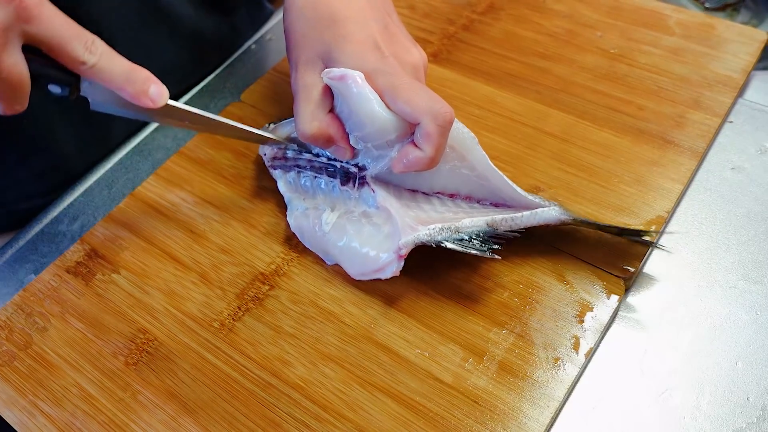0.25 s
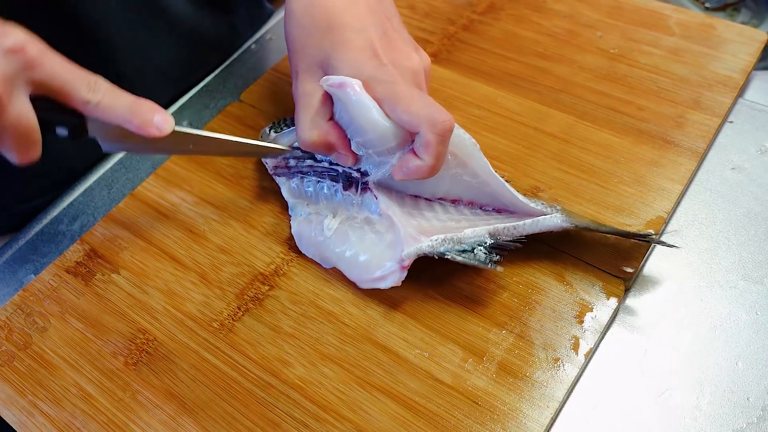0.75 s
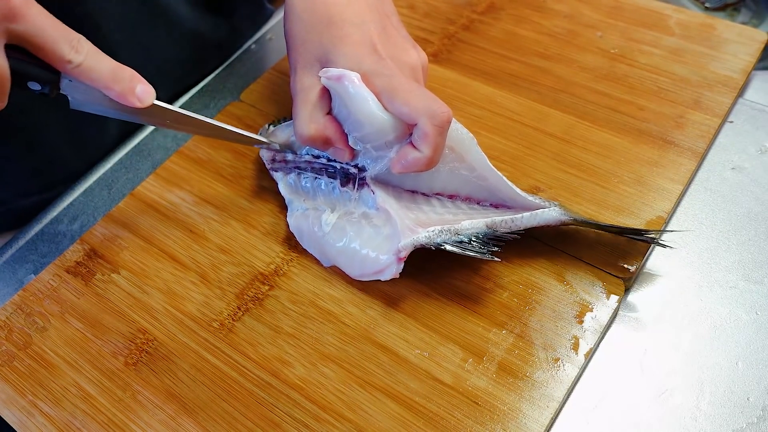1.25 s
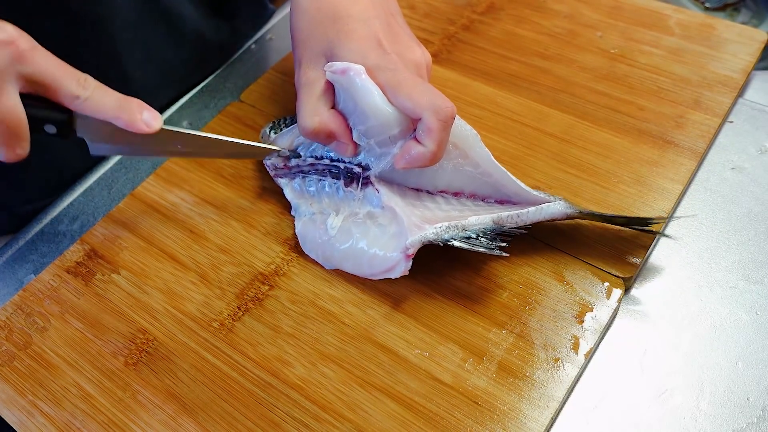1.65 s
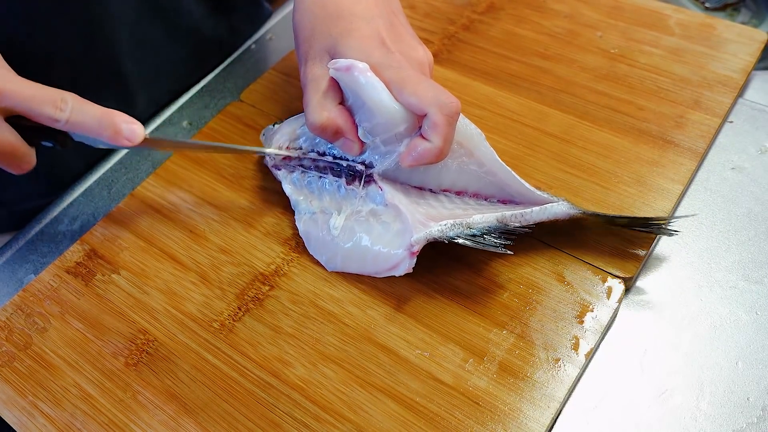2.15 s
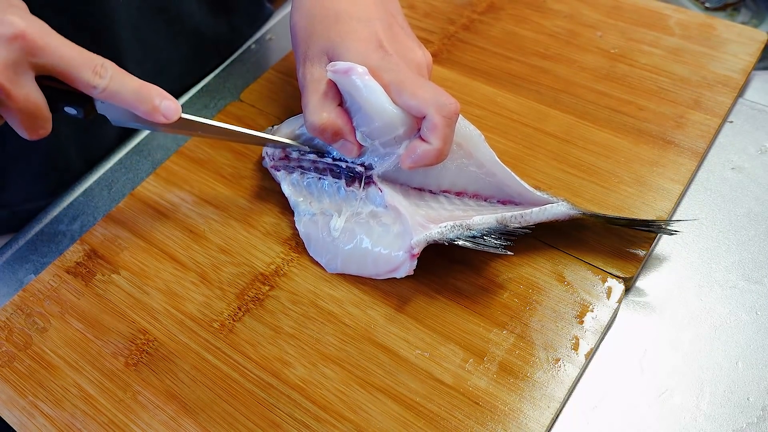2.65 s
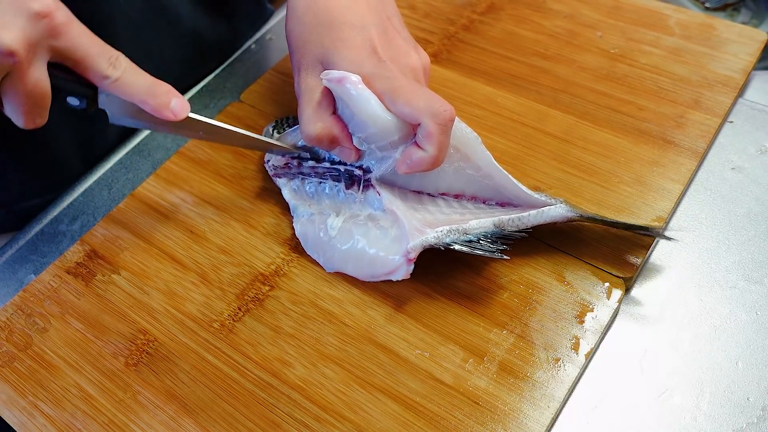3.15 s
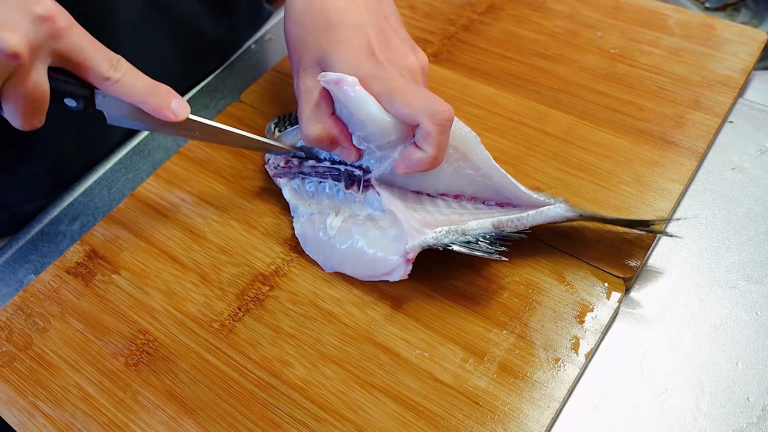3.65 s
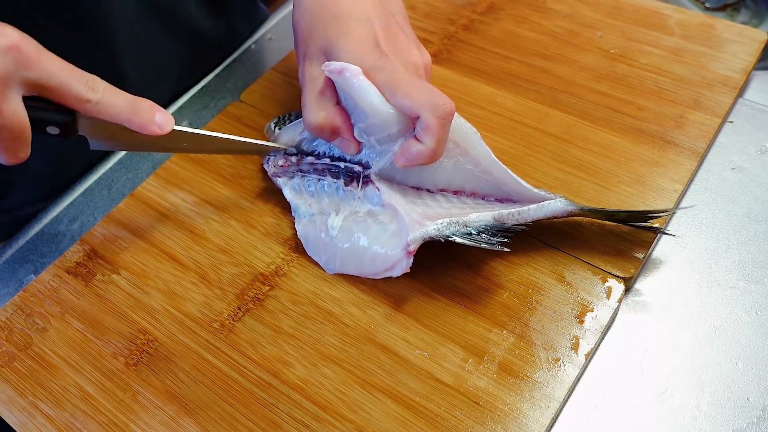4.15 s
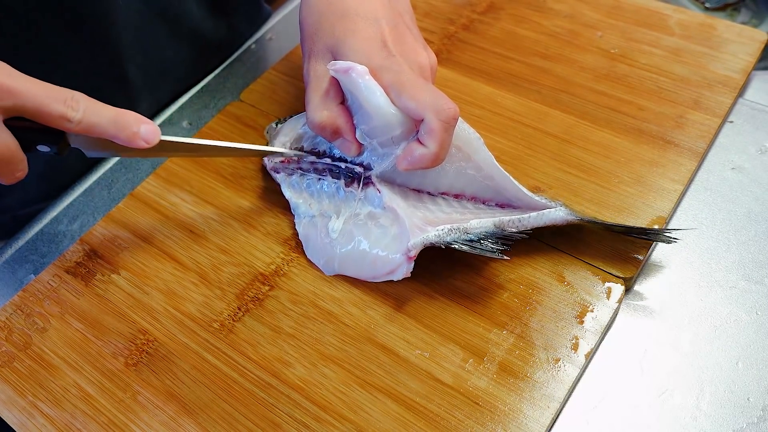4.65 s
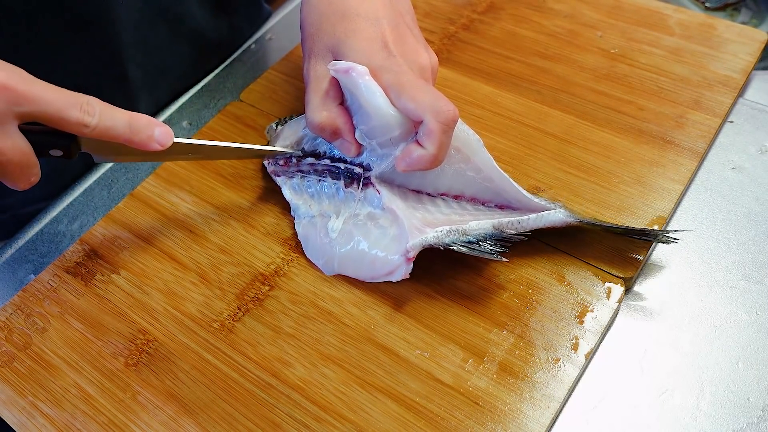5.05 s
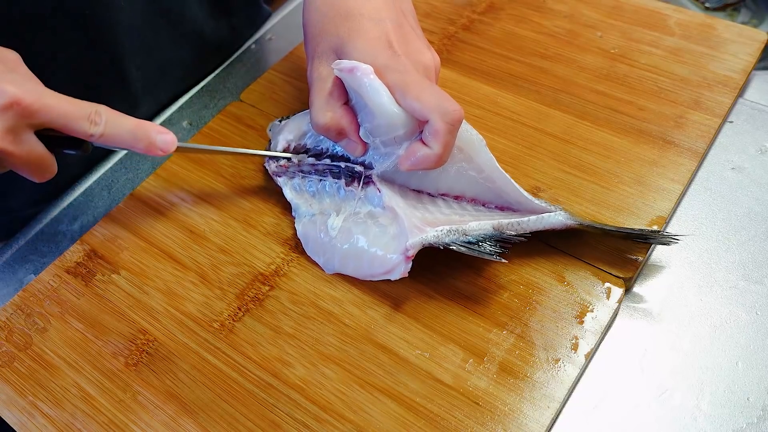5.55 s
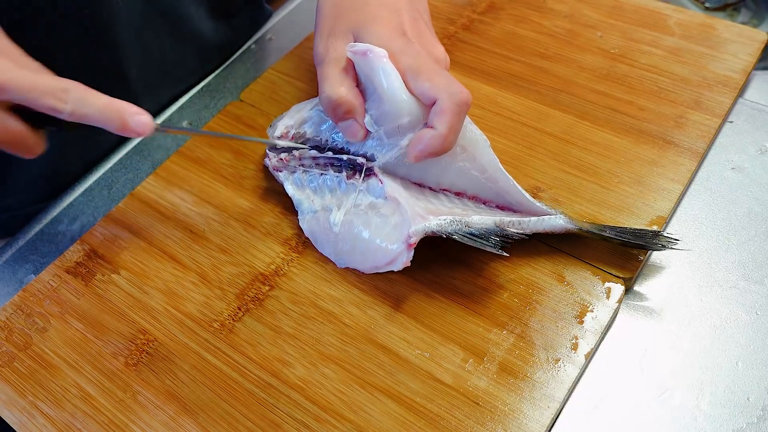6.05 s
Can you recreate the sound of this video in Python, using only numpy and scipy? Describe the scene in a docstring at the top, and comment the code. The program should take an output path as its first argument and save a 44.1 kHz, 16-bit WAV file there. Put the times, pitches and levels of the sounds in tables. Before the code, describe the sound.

Close to the microphone, a knife cuts fish bones on a wooden board. Small ticks and wet crackling lead to a hard cluster of snaps and thumps early on, then a quieter stretch with wet pops. A denser run of bright cracks follows, ending in a strong snap; after a lull come a few more clicks. Steady ventilation rushes throughout a small, hard-walled kitchen.

```python
"""First comes a tiny rasp of steel on bone, over the steady rush of ventilation in a small hard kitchen.
A knife works along the backbone of a fish on a wooden board, close to the microphone. Ribs snap (bursts of
tiny breaks), thump the board and ring the blade (dying sines); in between, the edge rasps (filtered slips),
wet flesh crackles (random clicks) and pops (short rising tones). Noise echoes make the room."""
import sys
import numpy as np
from scipy import signal
from scipy.fft import rfft, irfft
from scipy.io import wavfile
from scipy.ndimage import uniform_filter1d

SR = 44100
rng = np.random.default_rng(int(sys.argv[2]) if len(sys.argv) > 2 else 0)


def pcm_store(signal):
    """Save signal as 16-bit PCM."""
    levels = np.round(np.clip(np.atleast_2d(signal), -1, 1) * 32767)
    wavfile.write(sys.argv[1], SR, levels.astype(np.int16).T)


N = 277830  # length in samples: 6.3 s

# All levels in the tables are starting levels, trimmed again in the mix.
# how fast the room's echo dies: pitch_hz, time_to_fall_60_db_s
ROOM_DECAY = [(200, 0.52), (600, 0.65), (1500, 0.33), (4000, 0.25), (9000, 0.25), (15000, 0.18)]
# tone of the room's echo: pitch_hz, level_db
ROOM_COLOUR = [(150, -1), (400, 2), (1500, 2), (4000, -3.5), (8000, -2), (15000, -3.5)]
# echoes from near surfaces: delay_ms (varied a little at random), share (of the direct sound)
NEAR_ECHOES = [(.85, 0.41), (2.55, 0.023), (3.1, 0.21)]
# tone of the ventilation: pitch_hz, relative_level_db (per Hz)
VENT_COLOUR = [(25, -18), (90, -16), (125, -13.5), (160, -15), (200, -5), (330, 2), (480, 2), (800, 0),
               (1050, -3), (1500, -2), (2500, -10.5), (5000, -16), (7000, -17.5), (15800, -23.5)]
# how alike the ventilation is at left and right: pitch_hz, likeness (0 to 1)
VENT_LIKENESS = [(100, 0.65), (600, 0.59), (3000, 0.5), (7000, 0.46), (15000, 0.84)]
# faint fan tones: pitch_hz (average), level_db
VENT_TONES = [(430, -67.5), (1443, -72.5), (1836, -70)]
# the fish shoved over the board: start_s, length_s, level_db
SHOVES = [(.015, 0.027, -38.5), (.06, 0.043, -49), (0.257, .09, -42.5), (1.339, 0.044, -35),
          (1.389, 0.044, -41), (1.598, 0.058, -44.5), (5.321, .06, -58), (5.418, 0.033, -58),
          (6.282, .03, -43.5)]
# the knife breaks through and drives the fish into the board: start_s, level_db
THUDS = [(.024, -42), (.1338, -34.5), (0.3883, -29), (0.7471, -41), (0.9923, -44), (1.3473, -27),
         (1.3665, -22), (1.3927, -25), (1.4154, -29.5), (1.7502, -29.5), (3.093, -29), (3.4653, -37),
         (3.6161, -27.5), (3.8973, -35.5), (4.0475, -34), (5.4207, -34), (5.6296, -37.5)]
# what the board rings with: pitch_hz, level_db, time_to_fall_60_db_s
BOARD = [(127, -4, 0.13), (275.5, -6, 0.11), (346, 0.5, 0.031), (450, -2.5, 0.012), (570, -15, 0.021)]
# what the steel blade rings with: pitch_hz, level_db, time_to_fall_60_db_s
BLADE = [(1550, 11, 0.076), (2200, 10, 0.099), (3650, 4, 0.12), (3830, 10.5, 0.099), (4300, -14, 0.11),
         (5080, 6, 0.16), (7700, 1, 0.18), (7500, -33, 0.15), (7600, -48, 0.14), (8170, -14, 0.23),
         (10000, -6, .2), (12000, -2, .2), (12900, -16, .2), (13482, -18, .2)]
# wet pops as the blade peels off the flesh: start_s, pitch_hz, level_db, decay_ms (sets the time scale)
POPS = [(0.2206, 5850, -35, 0.3), (1.901, 5030, -40, 0.48), (2.0175, 5030, -42.5, .7),
        (2.0625, 4530, -25, 0.35), (2.1831, 4740, -35, .22), (2.1872, 5160, -32.5, 0.87),
        (2.9355, 3860, -41.5, .8), (3.2042, 5700, -29.5, 0.21), (3.4956, 4200, -36, 0.084),
        (3.557, 4520, -39, 0.21), (3.7217, 3240, -38.5, 0.27), (3.7691, 4550, -33.5, 0.32),
        (3.795, 4700, -41, 0.2), (4.8547, 5170, -44, 1.7), (5.155, 4530, -49, 0.38),
        (5.249, 4940, -45.5, 0.44)]
# strokes of the knife through wet flesh: start_s, length_s, effort_db (at the start of the stroke)
STROKES = [(0.0, 0.56, -48), (0.61, 0.93, -49.5), (1.304, 0.62, -46), (1.963, 0.44, -51.5),
           (2.64, 0.46, -54), (3.095, 0.41, -47.5), (3.42, 0.6, -46.5), (4.105, 0.37, -47),
           (5.329, 0.24, -43), (5.567, 0.43, -51.5)]
# the edge dragged over bone: start_s, length_s, level_db, pitch_hz, fizz_db (relative to the rasp)
RASPS = [(0.0, 0.0067, -31, 6000, 10), (0.022, 0.1, -48.5, 6440, 3), (1.398, 0.026, -43, 3320, 17),
         (1.407, 0.043, -36, 7600, -3), (1.735, 0.019, -37, 4620, 5), (2.129, 0.055, -34, 4340, -1),
         (3.097, 0.013, -47, 4420, 3), (3.405, 0.039, -54, 5600, -7), (3.664, .044, -49, 7300, 11),
         (5.328, 0.023, -47, 7250, 11), (5.335, 0.071, -55.5, 1550, -13), (5.408, 0.033, -35.5, 7100, -10),
         (5.625, .014, -41, 5650, -7)]
# bones snapping under the edge:
# start_s, crumble_ms (sets the time scale), strength_db, brightness_db, knock_db (through the flesh)
CRACKS = [(.0224, 1.5, -45, -9, -38), (.0733, 1, -40.5, -1, -43), (.1322, 0.54, -27, -1, -32.5),
          (.3868, 0.45, -33, 4.5, -31.5), (.5388, 0.39, -45, 3.5, -51), (.6916, .5, -36, 4, -46),
          (.7432, 1.8, -38, 0, -52), (.7638, 1.4, -39.5, 4, -57), (.7782, 0.93, -36, 4.5, -61),
          (.7916, .3, -42, 4, -64), (.9898, 1.1, -39, 1.5, -30.5), (1.3151, 1.1, -49, -8.5, -45),
          (1.341, 1, -34, 2.5, -45), (1.3459, 2.3, -40.5, -7, -32), (1.3645, 0.48, -19.5, 0, -23.5),
          (1.39, 0.37, -23, 2, -29.5), (1.4128, .9, -23.5, 0.5, -47), (1.577, 0.84, -41.5, -1, -44.5),
          (1.7472, 0.27, -25, 4, -33), (1.8138, 0.73, -42, 4, -51), (1.926, 0.17, -28.5, 1.5, -53),
          (2.5729, 0.97, -39, -4, -61), (2.812, 1.2, -37, 3.5, -66), (2.9137, .2, -49.5, 8, -51),
          (3.0328, 1.2, -42, 0, -59), (3.0513, 0.44, -29.5, -5.5, -34), (3.0808, 1.2, -21, 2, -28),
          (3.0914, 2.1, -18, 0.5, -54), (3.0989, 0.39, -42, 5, -33), (3.1068, 2, -33, 6, -45),
          (3.2155, 0.17, -37, 13.5, -45), (3.2814, 0.39, -44.5, 7.5, -48), (3.3703, 0.6, -43.5, 5, -58),
          (3.4138, .9, -45, -6, -50), (3.4351, 2.6, -51, -9, -48), (3.4639, 2.4, -29, 2.5, -36),
          (3.5937, .3, -42, 3, -46), (3.6139, 1, -37, -3, -36.5), (3.765, 0.82, -40, 3, -46),
          (3.8102, 1.7, -37.5, -0.5, -44), (3.876, .8, -28, -1.5, -32.5), (3.8955, 1, -22.5, 0.5, -35),
          (3.9396, 0.48, -32, 1.5, -43), (4.0339, 1.5, -46, 0, -34.5), (4.0462, 0.73, -14.5, 1, -25),
          (4.351, 3.4, -44, -4, -47.5), (4.8548, 1.5, -51, -2, -63), (5.3555, 2.2, -37, -2, -42),
          (5.408, 0.53, -27.5, 4, -36), (5.4199, 0.22, -22, 3, -29.5), (5.5017, 1.8, -41, 3, -59),
          (5.602, 3.9, -41, 5, -62), (5.6278, 10, -32, -1, -39), (5.924, 1.3, -40.5, 5, -66),
          (5.938, 1.2, -34, 9, -65)]
# the middle colour of breaking bone: pitch_hz (for a bone that snaps at SNAP_HZ), level_db
SNAP = [(1400, -24.5), (2300, -2.5), (3300, -1), (4000, 0), (4500, 1.5), (5100, -5.5), (5800, -1),
        (6800, -13.5), (9000, -42)]
# the crisp colour of breaking bone: pitch_hz, level_db
CRISP = [(4500, -38), (6000, -5.5), (6700, -8), (7300, 0.5), (8300, 0.5), (9000, 0.5), (10500, 2),
         (12500, -22)]
# the highest, fizzing colour of breaking bone: pitch_hz, level_db
FIZZ = [(8500, -36.5), (11000, -2.5), (13000, 0.5), (14500, 1), (15700, -7), (16800, -19)]
# the dull knock of a blow through the flesh: pitch_hz, level_db
KNOCK = [(150, -33), (450, -16.5), (850, -9), (1100, -13.5), (1420, -5), (1650, 6.5), (1850, -5),
         (2080, -9.5), (2400, -15.5), (3400, -15), (6000, -55)]
# the short woody ring of that knock: pitch_hz, level_db, time_to_fall_60_db_s
KNOCK_RING = [(1420, 0, .014), (1580, -1, .014)]
# soft rustle of fish on wood: pitch_hz, level_db
RUSTLE = [(150, -16.0), (330, -4.5), (600, -7.0), (1000, -19.5), (1550, -13.5), (2300, -18.5), (5000, -36)]
# fizz of steel on bone: pitch_hz, level_db
RASP_FIZZ = [(1500, -1), (6500, 10.5), (13000, 9), (16000, 3.5)]

CLUTTER_S = .007  # fading time of the scatter from board, fish and hands
VENT_DB = -47.5  # level of the rushing air
EDGE_HZ = 16300  # upper band limit of the microphone
SNAP_HZ = 4500  # the middle of the SNAP colour
# a bone of middling strength (BONE_DB) snaps at BONE_HZ; stronger ones are thicker and snap lower
BONE_HZ, BONE_DB, BONE_HZ_PER_DB = 5020, -20, -42
BONE_RING_S = 0.0053  # a broken bone's ring falls 60 dB in this time
# each stroke bites quickly, eases as the flesh parts and lets go; a resting knife barely crackles
BITE_S, EASE_DB_PER_S, LET_GO_S, REST_DB = 0.013, -13, 0.041, -59
CLUMP_DB = 2.5  # fibres part in clumps: how much the crackle wavers
# how strongly a snap and a sliding edge ring the steel
SNAP_BLADE_DB, SLIDE_BLADE_DB = -14, -22


def amp(db):
    """Turns decibels into a gain."""
    return 10 ** (np.asarray(db) / 20)


def evened(x):
    """Scales to an average strength (rms) of one."""
    return x / np.sqrt(np.mean(x ** 2) + 1e-20)


def unit(x):
    """Scales to an energy of one."""
    return x / np.sqrt(np.sum(x ** 2) + 1e-20)


def blow(sound, db):
    """Gives a short sound the energy of 5 ms at this level."""
    return amp(db) * np.sqrt(.005 * SR) * unit(sound)


def read(points, hz):
    """Reads a table between its points, with pitch on a logarithmic scale."""
    point_hz, value = np.transpose(points)
    return np.interp(np.log(hz + 1), np.log(point_hz + 1), value)


def add(mix, s, sound):
    """Mixes a sound in, starting at s seconds."""
    part = mix[round(s * SR):][:len(sound)]
    part += sound[:len(part)]


def colour(points, size=2048):
    """Makes the most compact pulse (minimum phase) with a given spectrum that does not start early."""
    log_gain = np.log(amp(read(points, abs(np.fft.fftfreq(size, 1 / SR)))))
    spectrum = np.exp(np.conj(signal.hilbert(log_gain)))
    return unit(np.fft.ifft(spectrum).real[:size // 2])


def ring(modes, stretch=1, size=16384, uneven_db=0):
    """A struck body rings as a sum of dying sines; their shares can vary at random."""
    t = np.arange(size) / SR
    total = np.zeros(size)
    for hz, db, t60 in modes:
        share = amp(db + uneven_db * rng.uniform(-1.7, 1))
        fading = np.exp(-np.log(1000) * t / t60)
        total += share * fading * np.sin(2 * np.pi * hz * stretch * t)
    return unit(total)


def drift(rate_hz):
    """Smooth random wandering with an rms of one; a higher rate wanders faster."""
    hz = np.fft.rfftfreq(N, 1 / SR)
    return evened(irfft(rfft(rng.standard_normal(N)) * np.exp(-(hz / rate_hz) ** 2), N))


def grains(size, per_s, spread_db):
    """Random tiny slips, a few of them large."""
    heights = amp(spread_db * np.minimum(rng.exponential(1, size), 4))
    signed = heights * rng.choice([-1, 1], size)
    return signed * (rng.random(size) < per_s / SR)


def fracture(crumble_ms, first=6.6, spread_db=4, size=512):
    """A first break and a dying run of smaller ones."""
    ms = np.arange(size) * 1000 / SR
    run = evened(grains(size, 14000, spread_db)) * np.exp(-ms / max(crumble_ms, .1) / 2.96)
    run[0] += first
    return run


def near(x, clutter_db=-13.5, apart_db=-15):
    """The direct sound, scattered at once by board, fish and hands, with echoes from near surfaces."""
    t = np.arange(SR // 30) / SR
    # a very short scatter, opposite at left and right
    apart = unit(rng.standard_normal(len(t)) * np.exp(-t / 0.00033))
    answer = amp(apart_db) * apart * np.array([[1], [-1]])
    # a longer scatter, the same at both sides, that takes 1.8 ms to build up
    clutter = rng.standard_normal(len(t)) * np.exp(-t / CLUTTER_S) * np.minimum(t / 0.0018, 1)
    answer += amp(clutter_db) * unit(clutter)
    answer[:, 0] += 1  # the direct sound itself
    for ms, share in NEAR_ECHOES:
        answer[:, round(ms * rng.uniform(.85, 1.15) * SR / 1000)] += share
    return signal.oaconvolve(x[None], answer, axes=1)[:, :N]


def walls(x, likeness=0.79, lumpy_db=1.0, rise_s=0.0021):
    """Clumps of reflections from hard walls, each band dying at its own speed."""
    t = np.arange(SR // 2) / SR
    lumps = evened(amp(lumpy_db * drift(380)[:len(t)]))
    shared, apart = rng.standard_normal((2, len(t))) * lumps
    noise = np.sqrt((1 + likeness) / 2) * shared + np.sqrt((1 - likeness) / 2) * np.array([apart, -apart])
    # shape the noise band by band: its fading, then its tone
    hz, at, z = signal.stft(noise, SR, nperseg=256)
    fading = np.log(1000) / read(ROOM_DECAY, hz)[:, None]
    z = z * np.exp(-fading * at) * np.sqrt(2 * fading / SR)
    z = z * amp(read(ROOM_COLOUR, hz))[:, None]
    answer = signal.istft(z, SR, nperseg=256)[1][:, :len(t)] * (1 - np.exp(-t / rise_s))
    return signal.oaconvolve(x[None], answer, axes=1)[:, :N]


def kitchen(x, wet_db):
    """A close sound with its share of the reflections from the walls."""
    return near(x) + amp(wet_db) * walls(x)


def ventilation(patchy_db=0.44, waver_hz=3):
    """Rushing air is shaped noise with drifting patches, plus a few wavering fan tones."""
    hz = np.fft.rfftfreq(2048, 1 / SR)
    a, b, c, d, patches = rng.standard_normal((N // 512 + 5, len(hz), 5)).T
    # smooth the patches over pitch, then over time
    patches = uniform_filter1d(patches, size=14, axis=0)
    patches = evened(uniform_filter1d(patches, size=8, axis=1))
    same = read(VENT_LIKENESS, hz)[:, None]
    mid, side = np.sqrt(1 + same) * (a + 1j * b), np.sqrt(1 - same) * (c + 1j * d)
    level_db = read(VENT_COLOUR, hz)[:, None] + patchy_db * patches
    z = np.array([mid + side, mid - side]) * amp(level_db)
    air = evened(signal.istft(z, nperseg=2048, noverlap=1536)[1][:, :N])
    tones = np.zeros(N)
    for tone_hz, db in VENT_TONES:
        turns = np.cumsum(tone_hz + waver_hz * drift(21.6)) / SR
        tones += amp(db) * np.sqrt(2) * np.sin(2 * np.pi * turns)
    return amp(VENT_DB) * air + tones


def shoves(slips_per_s=1200, board_db=-5):
    """The fish drags on the wood: many small slips give a low, soft rustle and ring the board."""
    out, body = np.zeros(N), amp(board_db) * ring(BOARD)
    add(body, 0, colour(RUSTLE))
    for s, length, db in SHOVES:
        size = round(length * SR)
        slips = grains(size, slips_per_s, 8.7) * signal.windows.tukey(size, .6)
        add(out, s, amp(db) * np.sqrt(size) * unit(signal.fftconvolve(slips, body)))
    return out


def thuds(level_db=1, detune=0.026):
    """When a bone gives way the knife drives the fish into the board, which rings."""
    out = np.zeros(N)
    for s, db in THUDS:
        stretch = 1 + detune * rng.uniform(-1, 1)
        add(out, s, blow(ring(BOARD, stretch, size=8192, uneven_db=2), db + level_db))
    return out


def pops(glide=0.025, tick_db=-12):
    """A small wet cavity opens with a tick and rings for a few cycles, rising in pitch."""
    out, ms = np.zeros(N), np.arange(400) * 1000 / SR
    for s, hz, db, decay_ms in POPS:
        age = ms / decay_ms
        turns = np.cumsum(hz * (1 + glide * (np.minimum(age, 4) - 1))) / SR
        add(out, s, blow(age * np.exp(-1.5 * age) * np.sin(2 * np.pi * turns), db))
        tick = np.convolve(fracture(decay_ms), colour(CRISP) + colour(FIZZ))
        add(out, s, blow(tick, db + tick_db))
    return out


def with_blade(x, blade_db):
    """Whatever happens at the edge also rings the steel a little."""
    return x + amp(blade_db) * signal.oaconvolve(x, ring(BLADE, uneven_db=5))[:N]


def singing(level_db=-68):
    """The sliding blade sings faintly and hoarsely: random slips ring one tone that swells and fades."""
    tone = signal.oaconvolve(grains(N, 600, 2), ring([(5270, 0, 0.016)]))[:N]
    return amp(level_db + 4 * np.tanh(drift(10))) * evened(tone)


def effort():
    """How hard the edge cuts: each stroke bites, eases and lets go."""
    out = np.full(N, amp(REST_DB))
    for s, length, db in STROKES:
        t = np.arange(round(length * SR)) / SR
        bite = np.minimum(t / BITE_S, 1)
        let_go = np.minimum((length - t) / LET_GO_S, 1)
        add(out, s, amp(db + EASE_DB_PER_S * t) * bite * let_go)
    return out


def slicing(level_db=-6, tears_per_s=520, spread_db=4, sinews_per_s=14, sinew_db=-7):
    """Wet fibres part one by one, now and then a tougher sinew; a resting knife barely crackles."""
    sinews = amp(sinew_db) * evened(grains(N, sinews_per_s, 1.6))
    tears = np.zeros(N)
    for kind, db in [(SNAP, 0), (CRISP, -1), (FIZZ, -2)]:
        clicks = evened(grains(N, tears_per_s, spread_db)) + sinews
        tears += amp(db) * signal.oaconvolve(clicks, colour(kind))[:N]
    return amp(level_db) * effort() * evened(tears * amp(CLUMP_DB * drift(7)))


def rasps(slips_per_s=5000, spread_db=1.5, width=1.28):
    """Dense slips of steel on bone ring the bone, swelling and fading with each drag."""
    out = np.zeros(N)
    for s, length, db, hz, fizz_db in RASPS:
        size = round(length * SR)
        slips = grains(size, slips_per_s, spread_db) * signal.windows.tukey(size, .8)
        band = signal.butter(4, [hz / width, hz * width], "bandpass", fs=SR, output="sos")
        body = signal.sosfilt(band, slips)
        fizz = np.convolve(slips, colour(RASP_FIZZ))[:size]
        add(out, s, amp(db) * evened(evened(body) + amp(fizz_db) * evened(fizz)))
    return out


def cracks(count, first=1.6, treble_db=-1.23, crisp_db=0.8, knock_db=2.5, spread_db=0.6,
           knock_spread_db=-5.5, knock_first=8, ring_db=-8, bone_ring_db=-8):
    """Bones break at a few spots: ragged toward the microphone, smooth pulses over the room."""
    direct, spread = np.zeros((2, count, N))
    crisp, fizz = colour(CRISP), colour(FIZZ)
    knock = colour(KNOCK) + amp(ring_db) * ring(KNOCK_RING, size=1024)
    for k, (s, crumble_ms, db, bright_db, push_db) in enumerate(CRACKS):
        spot = k % count  # take the spots in turn
        bone_hz = BONE_HZ + BONE_HZ_PER_DB * (db - BONE_DB)
        snap = colour([(hz * bone_hz / SNAP_HZ, level) for hz, level in SNAP])
        snap = snap + amp(bone_ring_db) * ring([(bone_hz, 0, BONE_RING_S)], size=1024)
        # a bright break trades the low snap for fizz
        for level, pulse in [(db - bright_db, snap), (db + crisp_db, crisp), (db + bright_db, fizz)]:
            ragged = np.convolve(fracture(crumble_ms, first), pulse)
            add(direct[spot], s, blow(ragged, level + treble_db))
            add(spread[spot], s, blow(pulse, level + treble_db + spread_db))
        # the flesh passes on mainly the first break, as one compact knock
        compact = np.convolve(fracture(crumble_ms, knock_first), knock)
        add(direct[spot], s, blow(compact, push_db + knock_db))
        add(spread[spot], s, blow(knock, push_db + knock_db + knock_spread_db))
    return direct, spread


def scene(edge_db=-2.5, board_db=-2, board_cut_hz=215):
    """Each spot on the fish has its own paths through the room; the board radiates little bass."""
    blows = thuds() + shoves()
    bass_cut = signal.butter(4, board_cut_hz, "highpass", fs=SR, output="sos")
    board = signal.sosfilt(bass_cut, blows) + amp(-14.5) * blows
    edge = kitchen(pops(), wet_db=-1.5)
    sliding = with_blade(rasps() + slicing(), SLIDE_BLADE_DB) + singing()
    edge += kitchen(sliding, wet_db=3.5)
    for direct, spread in zip(*cracks(count=7)):
        edge += near(direct) + walls(with_blade(spread, SNAP_BLADE_DB))
    return ventilation() + amp(board_db) * kitchen(board, wet_db=-7.0) + amp(edge_db) * edge


def record(dry):
    """The microphone's bass cut, a gentle rounding of the highest peaks, then the band limit."""
    bass_cut = signal.butter(4, 165, "highpass", fs=SR, output="sos")
    thin = signal.sosfilt(bass_cut, dry) + amp(-23.0) * dry  # a little bass remains
    rounded = 1.2 * np.tanh(thin / 1.2)
    band_limit = signal.firwin(255, EDGE_HZ, window=("kaiser", 8), fs=SR)
    return signal.oaconvolve(rounded, band_limit[None], "same")


dry = scene()
out = record(dry)
pcm_store(out)
```